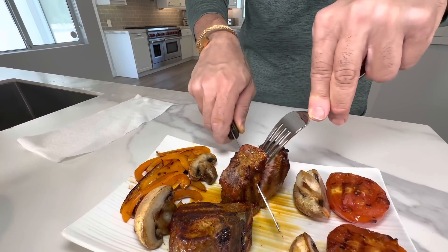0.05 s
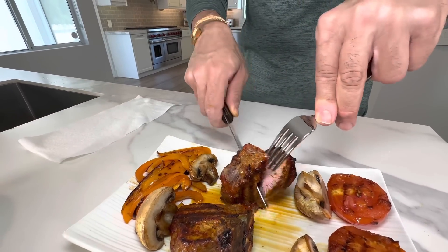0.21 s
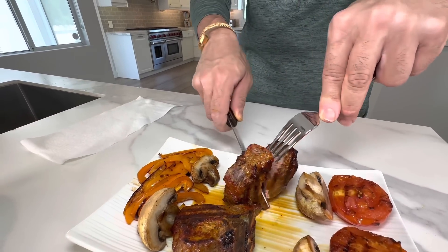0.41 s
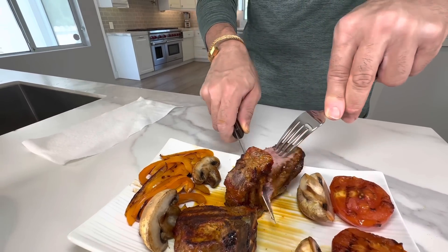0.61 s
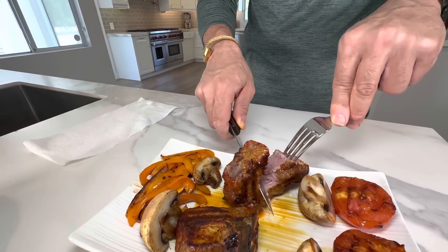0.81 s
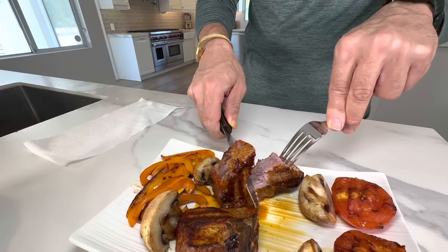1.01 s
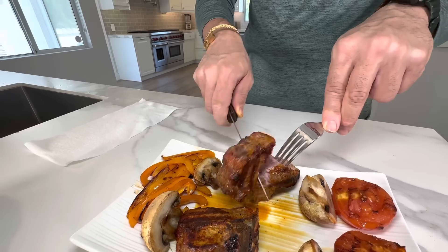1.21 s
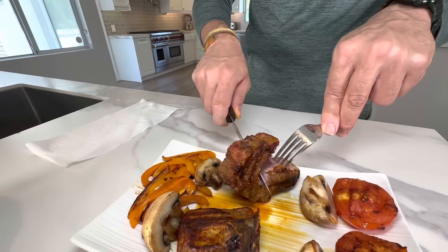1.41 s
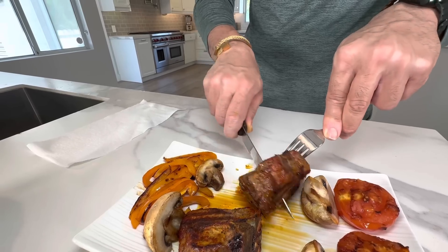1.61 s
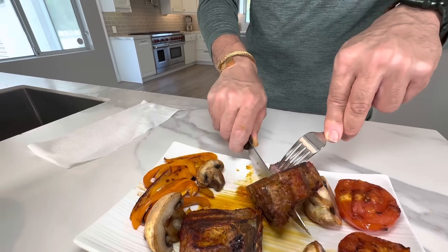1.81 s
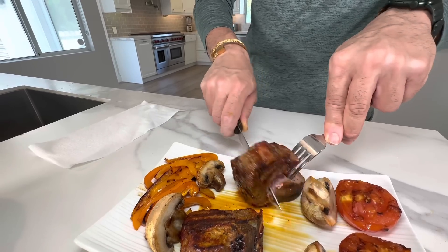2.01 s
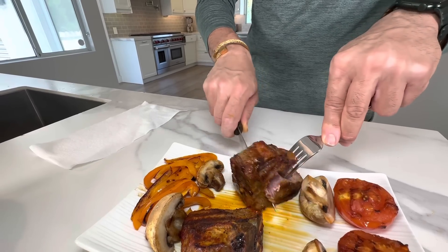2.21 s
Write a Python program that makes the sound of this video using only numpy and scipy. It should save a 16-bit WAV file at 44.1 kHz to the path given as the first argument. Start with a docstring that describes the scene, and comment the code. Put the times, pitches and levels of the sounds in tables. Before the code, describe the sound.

A knife cutting meat knocks sharply on a ceramic plate, then scrapes briefly in a kitchen

```python
"""Knife on a ceramic plate

A knife cuts down through meat and knocks on a ceramic plate that lies on a stone counter.
Each knock excites decaying modes and a short noise crack; the blade scrapes once as a run of tiny slips.
Sparse reflections make the hard kitchen. Meat and juice crackle faintly as grainy noise and single ticks,
over coloured noise for the room's air, resonated noise for its low hums and a narrow whirr.
"""
import sys
import numpy as np
from scipy import signal
from scipy.fft import rfft, irfft
from scipy.io import wavfile

SR = 44100
rng = np.random.default_rng(int(sys.argv[2]) if len(sys.argv) > 2 else 0)


def wav_record(signal):
    """Record a signal, one row per channel, as 16-bit PCM in the file named by sys.argv[1]."""
    frames = np.transpose(np.atleast_2d(signal))
    bounded = np.clip(frames, -1, 1)
    # unit amplitude maps onto the largest positive 16-bit level
    quanta = np.round(bounded * 32767).astype(np.int16)
    wavfile.write(sys.argv[1], SR, quanta)


N = 101430
PRE = 4410  # samples computed before the start, for the knock already under way

# Knocks on the plate. Each row: start in seconds, spot struck (0 or 1), level in dB, then relative to it
# thud, body, low ring, second tone, upper ring and bright edge, all in dB.
KNOCKS = [(-0.03, 1, -12.5, 5.5, 7, 10.5, 4, 3.5, 2.5), (0.238, 0, -0.5, -6.5, -11.5, -7, -4.5, 3.5, 0),
          (0.3235, 1, -19, 10, 12, 17.5, 11.5, 11, 7), (0.361, 1, -40, 24, 28, 5, 23, 18, -17),
          (0.434, 1, -24, 8, -7, -26, 5, -4, -31), (0.641, 1, -35, 19, 19.5, 13, 8.5, -2.5, -4),
          (0.856, 0, -31.5, 9, 7.5, 13, 5.5, 5, -11.5), (0.9106, 0, -31, 5, 5.5, 13.5, 1.5, 3, -23.5),
          (1.136, 0, -30, 5.5, 2, 12, -1.5, 1.5, -27), (1.489, 1, -11, 2, 1.5, 8.5, 1.5, 6.5, -1.5),
          (1.5057, 1, -38.5, 11, 9, 0.5, 0.5, 6, 25.5), (1.528, 1, -28, -2, -10, -7, -18, 8.5, -0.5),
          (1.536, 1, -22.5, 8.5, 12, 6.5, -29, -27, -8)]
# Frequencies in Hz at which thud, body, low ring, level, second tone, upper ring and edge apply.
COLOUR_HZ = [200, 380, 600, 1058, 1172, 1750, 2700]
# Modes of plate and counter. Each row: frequency in Hz, relative level in dB from spot 0 and in dB from
# spot 1, 60 dB decay time in seconds, rise time in seconds.
PLATE_MODES = [(115.4, -41.5, -21, 0.2, 0.0087), (182, -15.5, -10, 0.082, 0.0079),
               (248.5, -7, -14, 0.07, 0.0055), (310, -11, -26, 0.093, 0.0066),
               (377.8, -20.5, -16.5, .07, 0.0061), (495, -9, -15, 0.025, 0.0019),
               (652.5, -3.5, -8.5, 0.023, 0.0018), (832.7, -1.5, -12, 0.03, 0.0035),
               (1069.4, 2, -1, 0.041, 0.0028), (1188.2, 5.5, -5, 0.031, 0.0029),
               (1423, -3, -16, 0.047, 0.0035), (1626, -11.5, -13.5, 0.033, 0.0019),
               (1755, -13.5, -10, 0.034, 0.002), (2017, -15.5, -19, 0.022, 0.0011),
               (2310, -18.5, -22.5, 0.059, 0.0017), (2434, -21.5, -21.5, 0.025, 0.0015),
               (2522, -11, -10, 0.018, 0.00068), (3368, -26, -28.5, 0.08, 0.0015),
               (3940, -28, -31.5, 0.031, .001), (4550, -27, -34.5, .05, 0.0012),
               (4970, -35.5, -35.5, .04, 0.00087)]
# How the microphone pair hears each mode, one list for each spot.
# Each row: left minus right in dB, phase by which left leads in radians.
MODES_HEARD = [
    [(4, -.3), (4, .1), (7, 0), (12, -.3), (8, -.3), (8, -.3), (-4, -2.1), (-3, -1), (-4, .1), (4, -.6),
     (0, 2.6), (-4, -1.5), (-4, -1.5), (-2, -1), (0, 1), (0, .6), (-1, .2), (0, -1.4), (2, -.3), (2, -2.1),
     (2, -3)],
    [(1, .2), (3, .2), (3, .4), (3, .6), (2, .5), (-5, .4), (6, 1.1), (1, -1.1), (-2, .1), (-1, .4),
     (-5, .5), (-2, .2), (-2, .2), (2, 1), (5, 1.5), (2, 1.4), (0, 1.4), (-2, 1.6), (4, -1.5), (4, -2),
     (5, 3)],
]
LATE_SHARE = 0.47  # a mode waits this share of its rise before it swells
CRACK_DB = (-16, -20)  # relative, from spot 0 and from spot 1
CRACK_RISE_S, CRACK_T60_S, CRACK_LAG_S = 0.002, 0.025, 0.00005  # the right channel lags
CRACK_LOW_HZ, CRACK_TOP_HZ = 3340, 8900

# Reverberation of the kitchen. Each row: frequency in Hz, 60 dB decay time in seconds.
KITCHEN_DECAY = [(100, 0.63), (400, 0.65), (1000, 0.63), (2500, 0.55), (6000, 0.52), (12000, 0.22)]
WET_DB, FIRST_ECHO_S = -14, 0.0076
# Likeness of left and right in the room. Each row: frequency in Hz, correlation from 0 to 1.
LIKENESS = [(30, 1), (100, 0.46), (250, 0.051), (550, 0.088), (1500, 0.0025), (8000, 0)]

# Fizz of meat and juice. Each row: time in seconds, level in dB.
FIZZ_LEVEL = [(0, -49), (.12, -60), (.14, -60), (.16, -55), (.22, -56.5), (.36, -69), (.39, -52),
              (.48, -55.5), (.56, -55.5), (.74, -64.5), (.78, -79), (1.18, -72), (1.26, -63), (1.34, -74),
              (1.5, -65), (1.66, -61.5), (1.78, -53.5), (1.82, -57.5), (1.88, -67), (1.94, -62),
              (1.97, -53.5), (2.08, -53.5), (2.2, -67), (2.3, -55)]
# Colour of the fizz. Each row: frequency in Hz, relative spectral level in dB per Hz.
FIZZ_SPECTRUM = [(1200, -38), (2200, -3), (3500, -7.5), (5300, -12.5), (6300, -7.5), (7600, -13.5),
                 (9500, -7.5), (11000, -10.5), (13500, -10), (15500, -6)]
GRAINS_PER_S, GRAIN_SPREAD_DB, GRAIN_DB = 2300, 1, 10

# Colour of the room's air. Each row: frequency in Hz, relative spectral level in dB per Hz.
AIR_SPECTRUM = [(12, -26.5), (20, -2), (129, -3.5), (252, -5), (834, -18), (1200, -13.5), (1540, -20.5),
                (1920, -17.5), (2270, -34), (6020, -36), (7520, -42), (9930, -36), (12100, -53.5),
                (13500, -49.5), (15500, -41.5)]
AIR_DB = -62
# Low hums. Each row: frequency in Hz, bandwidth in Hz, level in dB.
HUMS = [(126, 5.2, -67), (137, 4.5, -62.5), (232, 2.8, -67)]
# Narrow whirr. Each row: time in seconds, level in dB.
WHIRR_LEVEL = [(0, -61), (.7, -87), (1.14, -91), (1.22, -66.5), (1.4, -66), (1.9, -65.5), (2.3, -64.5)]
WHIRR_HZ, WHIRR_WIDTH_HZ = 1840, 300

# Single wet ticks. Each row: start in seconds, level before rise, decay and panning in dB, centre in Hz.
TICKS = [(0.095, -51, 7960), (0.104, -50, 14800), (0.152, -46.5, 14500), (0.381, -48.5, 10600),
         (0.543, -49.5, 6700), (0.821, -63, 3050), (0.842, -55.5, 2700), (0.844, -57.5, 7740),
         (1.059, -58, 14400), (1.238, -57, 13500), (1.757, -52.5, 14000), (1.968, -51.5, 7000),
         (2.025, -53, 4530), (2.048, -44, 3370)]
TICK_T60_S, TICK_RISE_S, TICK_PAN_DB = 0.024, 0.00084, -8.5  # pan is left minus right

# Blade dragged on the glaze. Each row: time in seconds, level in dB.
SCRAPE_LEVEL = [(1.97, -74), (2.05, -62.5), (2.075, -74.5), (2.103, -46), (2.125, -38), (2.146, -31.5),
                (2.158, -37.5), (2.175, -49.5), (2.195, -82), (2.3, -79)]
SCRAPE_COLOUR = (1, -3, -15, -5.5, -1, 0.5, 3.5)  # spot, then the six relative dB of a knock
SLIPS_PER_S = 3400

NOTCH_HZ, NOTCH_WIDTH_HZ, NOTCH_DB = 12110, 510, -21.5  # dip in the mid signal
MONO_HZ, RUMBLE_HZ = 13000, 44.4  # mono above the first, bass roll-off below the second
CEILING, EDGE_HZ = 1.2, 15900  # soft ceiling that rounds the loudest peaks, in full scales; band limit


def amp(db):
    """Level in decibels to amplitude ratio."""
    return 10 ** (np.asarray(db) / 20)


def evened(x):
    """Normalization to unit root-mean-square amplitude."""
    return x / np.sqrt(np.mean(x ** 2) + 1e-20)


def read(points, hz):
    """Interpolation of a spectrum along logarithmic frequency."""
    f, value = np.transpose(points)
    return np.interp(np.log(hz + 1), np.log(f + 1), value)


def level(curve):
    """Amplitude envelope from straight lines in decibels."""
    t, db = np.transpose(curve)
    return amp(np.interp(np.arange(N) / SR, t, db))


def resonate(x, hz, width):
    """Resonance of unit gain: shift to zero frequency, one-pole low-pass, shift back."""
    turn = np.exp(2j * np.pi * hz * np.arange(x.shape[-1]) / SR)
    r = np.exp(-np.pi * width / SR)
    return 2 * (turn * signal.lfilter([1 - r], [1, -r], x / turn)).real


def correlate(a, b, same):
    """Partial coherence: the right spectrum shares the given part of the left one."""
    return np.array([a, same * a + np.sqrt(1 - same ** 2) * b])


def diffuse_pair(noise, spectrum):
    """Diffuse sound field: coloured noise whose channels grow less alike with frequency overall."""
    left, right = rfft(noise)
    hz = np.fft.rfftfreq(N, 1 / SR)
    both = correlate(left, right, np.clip(read(LIKENESS, hz), -1, 1))
    return evened(irfft(both * amp(read(spectrum, hz)), N))


def crack(spot, edge_db, t):
    """Broadband contact transient: band-passed noise with a short rise and exponential decay."""
    band = signal.butter(2, [CRACK_LOW_HZ, CRACK_TOP_HZ], "band", fs=SR)
    noise = signal.lfilter(*band, rng.standard_normal(len(t)))
    decay = amp(CRACK_DB[round(spot)] + edge_db - 60 * t / CRACK_T60_S)
    left = decay * np.minimum(t / CRACK_RISE_S, 1) ** 2 * noise
    right = np.interp(t - CRACK_LAG_S, t, left, left=0)
    return np.array([left, right])


def ring(spot, thud_db, body_db, low_db, second_db, upper_db, edge_db):
    """Modal superposition: one contact gives damped modes, the low ones swelling later, and a crack."""
    t = np.arange(SR // 4) / SR
    side = np.array([.5, -.5])[:, None, None]  # axes: channel, mode, time
    hz, *spot_db, t60, rise = np.array(PLATE_MODES).T[:, :, None]
    pan_db, lead = np.array(MODES_HEARD[round(spot)]).T[:, :, None]
    colour_db = (thud_db, body_db, low_db, 0, second_db, upper_db, edge_db)
    colour = read(list(zip(COLOUR_HZ, colour_db)), hz)
    sign = (-1.) ** np.arange(len(PLATE_MODES))[:, None]  # neighbouring modes start in opposite directions
    decay = amp(spot_db[round(spot)] + colour - 60 * t / t60)
    swell = 1 - np.exp(-(np.maximum(t - LATE_SHARE * rise, 0) / rise) ** 2)
    tones = amp(side * pan_db) * np.sin(2 * np.pi * hz * t + side * lead)
    modes = (decay * swell * sign * tones).sum(1)
    return modes + crack(spot, edge_db, t)


def knocks():
    """Linear superposition: the plate's responses to all knocks add."""
    out = np.zeros((2, N + PRE + SR))
    for s, spot, db, *colour in KNOCKS:
        at = round(s * SR) + PRE
        sound = amp(db) * ring(spot, *colour)
        out[:, at:at + sound.shape[1]] += sound
    return out[:, :N + PRE]


def kitchen(x):
    """Reverberation: sparse reflections of random sign, each band dying at its own speed."""
    taps = np.zeros((2, SR))
    count = SR // 20 - 1  # one reflection in every 20 samples
    places = np.arange(count) * 20 + rng.integers(0, 20, (2, count))
    np.put_along_axis(taps, places, rng.choice([-1., 1.], (2, count)), 1)
    hz, t, bands = signal.stft(taps, SR, nperseg=256)
    bands = correlate(bands[0], bands[1], np.clip(read(LIKENESS, hz), 0, 1)[:, None])
    decay = amp(-60 * t / read(KITCHEN_DECAY, hz)[:, None])
    tail = signal.istft(bands * decay, SR, nperseg=256)[1]
    tail = tail * (np.arange(tail.shape[1]) > FIRST_ECHO_S * SR)
    return signal.fftconvolve(x[None], tail / np.linalg.norm(tail[0]), axes=1)[:, :len(x)]


def fizz():
    """Granular modulation: random decaying grains swell the noise of meat and juice."""
    size = amp(GRAIN_SPREAD_DB * np.minimum(rng.exponential(1, N), 5))
    grains = size * (rng.random(N) < GRAINS_PER_S / SR)
    lumps = evened(signal.oaconvolve(grains, np.exp(-np.arange(200) / 36.0))[:N])
    noise = rng.standard_normal((2, N)) * (1 + amp(GRAIN_DB) * lumps)
    return level(FIZZ_LEVEL) * diffuse_pair(noise, FIZZ_SPECTRUM)


def air():
    """Stationary coloured noise: the quiet air of the room."""
    return amp(AIR_DB) * diffuse_pair(rng.standard_normal((2, N)), AIR_SPECTRUM)


def hums():
    """Narrow-band noise: sharp resonances make low hums that waver."""
    out = np.zeros(N)
    for hz, width, db in HUMS:
        out += amp(db) * evened(resonate(rng.standard_normal(N), hz, width))
    return out


def whirr():
    """Cascaded resonance: noise passed twice through one band, partly alike left and right."""
    a, b = rng.standard_normal((2, N))
    noise = np.array([a, 0.73 * a + 0.88 * b])
    once = resonate(noise, WHIRR_HZ, WHIRR_WIDTH_HZ)
    return level(WHIRR_LEVEL) * evened(resonate(once, WHIRR_HZ, WHIRR_WIDTH_HZ))


def ticks():
    """Damped noise bursts: each wet tick joins a narrow and a wide resonance of equal level."""
    out = np.zeros((2, N))
    t = np.arange(2000) / SR
    for s, db, hz in TICKS:
        noise = rng.standard_normal(len(t))
        narrow = evened(resonate(noise, hz, 0.069 * hz))
        wide = evened(resonate(noise, hz, 0.76 * hz))
        envelope = amp(db - 60 * t / TICK_T60_S) * np.minimum(t / TICK_RISE_S, 1)
        tick = envelope * evened(narrow + wide)
        at = round(s * SR)
        out[:, at:at + len(t)] += tick * amp([[TICK_PAN_DB / 2], [-TICK_PAN_DB / 2]])
    return out


def scrape():
    """Convolution of excitation and response: a dense run of tiny uneven slips rings the same plate."""
    slips = rng.standard_normal(N) * (rng.random(N) < SLIPS_PER_S / SR)
    answer = ring(*SCRAPE_COLOUR)
    power = SLIPS_PER_S / SR * np.sum(answer[0] ** 2)  # expected power in the left channel
    onset = (SCRAPE_LEVEL[0][0] - .01, -120)
    drive = slips * level([onset] + list(SCRAPE_LEVEL)) / np.sqrt(power)
    return signal.oaconvolve(drive[None], answer, axes=1)[:, :N]


def scene():
    """Direct and reverberant sound: the plate with its reflections, plus meat and room tone."""
    plate = knocks()
    plate[:, PRE:] += scrape()
    heard = plate + amp(WET_DB) * kitchen(plate[0] + plate[1])
    meat = fizz() + ticks()
    room_tone = air() + hums() + whirr()
    return heard[:, PRE:] + meat + room_tone


def record(dry):
    """Mid-side filtering and soft limiting: bass roll-off, mid dip, mono treble, ceiling, band limit."""
    hz = np.fft.rfftfreq(N, 1 / SR)
    left, right = rfft(dry) / np.sqrt(1 + (RUMBLE_HZ / (hz + 1)) ** 4)
    notch = amp(NOTCH_DB * np.exp(-((hz - NOTCH_HZ) / NOTCH_WIDTH_HZ) ** 2))
    mid = (left + right) / 2 * notch
    side = (left - right) / 2 / (1 + (hz / MONO_HZ) ** 40)
    heard = irfft(np.array([mid + side, mid - side]), N)
    heard = CEILING * np.tanh(heard / CEILING)
    low_pass = signal.firwin(511, EDGE_HZ, window=("kaiser", 9), fs=SR)
    return signal.oaconvolve(heard, low_pass[None], "same")


dry = scene()
out = record(dry)
wav_record(out)
```